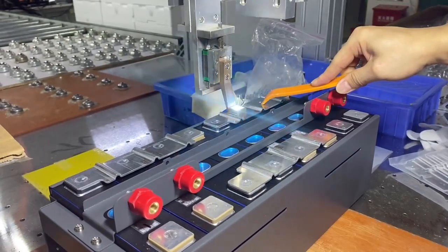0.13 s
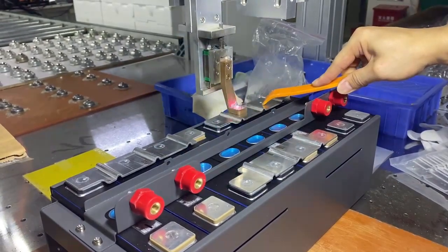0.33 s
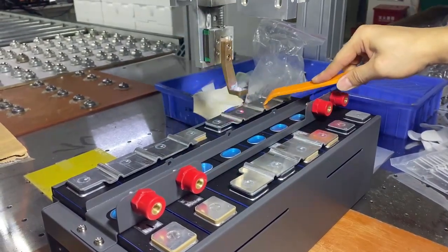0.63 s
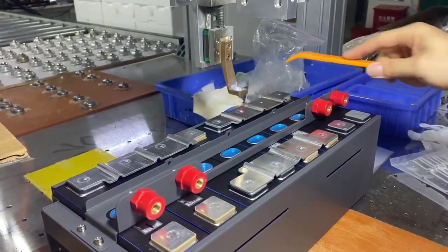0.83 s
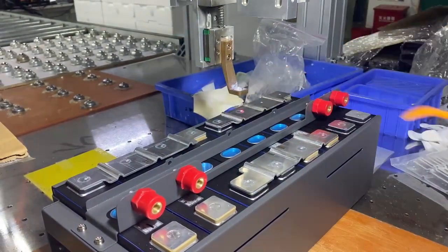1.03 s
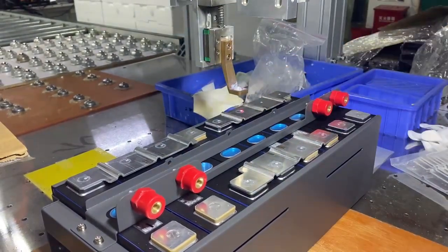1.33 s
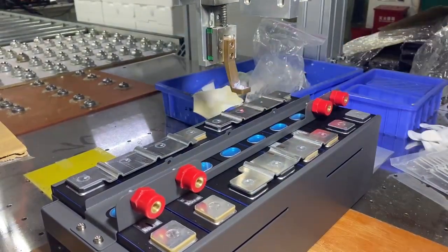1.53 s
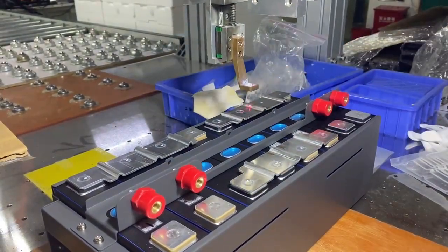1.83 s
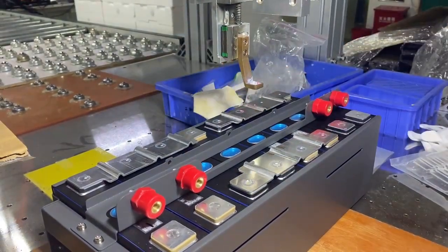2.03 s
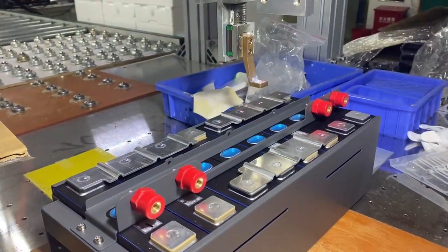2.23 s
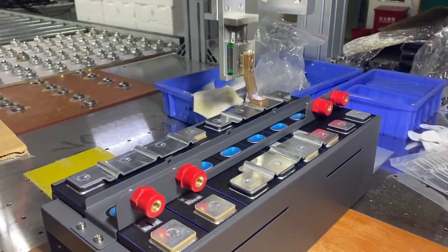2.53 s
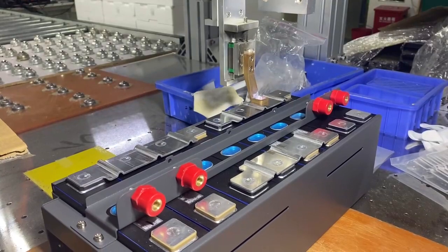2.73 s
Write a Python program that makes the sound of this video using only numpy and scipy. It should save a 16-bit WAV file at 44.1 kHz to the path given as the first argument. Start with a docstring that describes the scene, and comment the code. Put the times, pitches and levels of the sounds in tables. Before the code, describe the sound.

A loud, bright gas hiss from a welding head opens at full force and dies within half a second, leaving a low fan drone; later an air puff and sharp metal click, heard close in a workshop.

```python
"""A workshop with a laser spot welder. At once the weld's loud gas jet, hiss plus nozzle resonances, dies away
with a faint squeak and click; later the head lifts: an air valve puffs (noise through resonant ports),
the slide clicks against its stop (struck metal modes) and a short squeak of air follows.
An extractor fan drones (narrow noise bands, two soft low notes and a fainter higher one) over the hall's
coloured noise; a motor drive whines near 8 kHz (sine, modulated as the head moves)."""
import sys
import numpy as np
from scipy import signal
from scipy.fft import rfft, irfft, next_fast_len
from scipy.io import wavfile

SR = 44100
rng = np.random.default_rng(int(sys.argv[2]) if len(sys.argv) > 2 else 0)


def transcribe(signal):
    """Save signal, clipped to [-1, 1], as a 16-bit WAV file at the path in sys.argv[1]."""
    frames = np.atleast_2d(signal).T
    limited = np.clip(frames, -1, 1)
    pcm = np.round(limited * 32767).astype(np.int16)
    wavfile.write(sys.argv[1], SR, pcm)


def convert_level_to_amplitude(level_db):
    """Map a level in decibels to its linear amplitude factor."""
    exponent = np.asarray(level_db, float) / 20
    return 10 ** exponent


N = 127449
HZ = np.maximum(np.arange(N // 2 + 1) * SR / N, 1.0)
HALL_LAG_S = 0.000418


def rms_one(x):
    """Scale to rms 1."""
    return x / np.sqrt(np.mean(x ** 2) + 1e-20)


def in_time(rows):
    """Join (s, value) rows by straight lines."""
    return np.interp(np.arange(N) / SR, *np.transpose(rows))


def at_hz(points):
    """Join (Hz, value) rows on a log-frequency axis."""
    hz, value = np.transpose(points)
    return np.interp(np.log(HZ), np.log(hz), value)


def drift(rate_hz):
    """Slow random curve of rms 1: noise low-passed at rate_hz."""
    return rms_one(irfft(rfft(rng.standard_normal(N)) / (1 + (HZ / rate_hz) ** 2), N))


def air(gain, alike, lag_s):
    """Stereo noise of a given colour, rms 1; the shared part reaches the right side late."""
    shared, left, right = rfft(rng.standard_normal((3, N)))
    alike = np.clip(alike, 0, 1)
    common, own = np.sqrt(alike), np.sqrt(1 - alike)
    late = np.exp(-2j * np.pi * HZ * lag_s)
    sides = np.array([common * shared + own * left, common * shared * late + own * right])
    return rms_one(irfft(gain * sides, N))


def whistles(peaks, alike, lag_s):
    """Noise twice through each resonance, each at its own level."""
    total = 0
    for hz, width_hz, db in peaks:
        gain = 1 / (1 + (2 * (HZ - hz) / width_hz) ** 2)
        total = total + convert_level_to_amplitude(db) * air(gain, alike, lag_s)
    return total


def jet():
    """Turbulent hiss plus nozzle resonances, fluttering slightly; treble fades early, the low end swells late."""
    # gas jet at the weld: t/s, level/dB
    jet_level = [(0, -22.5), (.07, -21.5), (.18, -22), (.21, -26.5), (.3, -24.5), (.33, -31.5),
                 (.37, -36.5), (.42, -38.5), (.5, -42), (.6, -57)]
    # hiss spectrum: f/Hz, density/dB per Hz
    colour = [(300, -11.5), (600, 4), (1000, 2.5), (1600, 2.5), (2500, 1), (4200, 1.5), (5500, -4.5),
              (5900, -3), (7000, -4), (9500, -4), (12500, -5.5), (12950, 6), (13500, -2), (14000, -14),
              (14500, -1), (15100, 0), (16500, 0)]
    # nozzle resonances: f/Hz, width/Hz, level/dB against the hiss, before the share
    nozzle = [(1130, 130, -12.5), (1347, 146, -8), (1844, 110, -16), (3270, 40, -15), (3500, 330, -5.5),
              (4880, 110, -13), (5400, 250, -16), (6400, 400, -13), (8600, 300, -29), (11700, 530, -20)]
    # gain of the resonances, fading as the flow stops: t/s, gain/dB
    nozzle_share = [(0, 0.5), (.2, 0.5), (.33, 0), (.38, -3.5), (.5, -14)]
    # gain of the treble: t/s, gain/dB
    treble_gain = [(0, 2.5), (.18, 7.5), (.23, 8), (.3, 2), (.41, -5), (.5, -12)]
    # gain of the low end: t/s, gain/dB
    low_gain = [(0, -2), (.3, 2), (.36, 9.5), (.42, 0), (.5, -9)]
    alike, lag_s = 0.61, .00007
    treble_from_hz, low_under_hz = 6560, 1610
    flutter_db, flutter_hz = .6, 7.2

    hiss = air(convert_level_to_amplitude(at_hz(colour)), alike, lag_s)
    hiss = hiss + convert_level_to_amplitude(in_time(nozzle_share)) * whistles(nozzle, alike, lag_s)
    treble = irfft(rfft(hiss) / (1 + (treble_from_hz / HZ) ** 8), N)
    low = irfft(rfft(hiss) / (1 + (HZ / low_under_hz) ** 8), N)
    hiss = hiss + (convert_level_to_amplitude(in_time(treble_gain)) - 1) * treble + (convert_level_to_amplitude(in_time(low_gain)) - 1) * low
    return convert_level_to_amplitude(in_time(jet_level) + flutter_db * drift(flutter_hz)) * hiss


def hall():
    """Distant machines as broad noise; the fan's drone as narrow resonances of noise."""
    # hall noise: t/s, level/dB
    hall_level = [(0, -28.5), (.35, -33.5), (.6, -31), (.87, -32), (.94, -25.5), (1.5, -26), (2.3, -26.5),
                  (2.5, -24.5), (2.89, -25.5)]
    # noise spectrum: f/Hz, density/dB per Hz
    colour = [(20, -34), (45, -5), (75, -2.5), (110, -7), (160, -5.5), (230, -7), (300, -11.5),
              (400, -12.5), (520, -17.5), (620, -15.5), (900, -19.5), (1300, -22.5), (2000, -30.5),
              (3000, -33), (4500, -36.5), (6500, -46.5), (9000, -53), (12000, -55.5), (15000, -62)]
    # left-right likeness: f/Hz, shared power [0-1]
    likeness = [(50, 0.99), (250, 0.91), (600, 0.44), (1500, 0.092), (2600, 0.36), (3700, 0.27),
                (4500, 0.52), (6000, 0.083)]
    # stereo balance: f/Hz, left over right/dB
    balance = [(300, 1), (800, 3), (1500, 0), (5500, -1)]
    # fan drone: f/Hz, width/Hz, level/dB against the hall noise
    fan = [(111.7, 24, 1.5), (220.9, 21.8, -5.5), (587, 27, -20)]

    tilt = convert_level_to_amplitude(at_hz(balance) * [[.5], [-.5]])
    noise = air(convert_level_to_amplitude(at_hz(colour)) * tilt, at_hz(likeness), HALL_LAG_S)
    return convert_level_to_amplitude(in_time(hall_level)) * (noise + whistles(fan, 0.87, HALL_LAG_S))


def drive():
    """A carrier tone; side tones at the motor's turning rate and a throb while the head moves."""
    # drive whine: t/s, level/dB, motion of the head [0-1]
    whine = [(0, -76, 0), (.9, -70, 0), (1.0, -64, 0), (1.4, -60, 0), (1.46, -59.5, 0.9),
             (1.8, -58.5, 0.87), (2.2, -61, 1), (2.28, -65, 0), (2.6, -70, 0), (2.89, -72, 0)]
    whine_hz, turning_hz, turning_depth = 8000, 48, 0.88
    throb_hz, throb_db = 14.2, 3

    s, db, motion = np.transpose(whine)
    moving = in_time(np.c_[s, np.clip(motion, 0, 1)])
    throb = np.cos(2 * np.pi * np.cumsum(throb_hz * (1 + 0.088 * drift(4.0))) / SR)
    turning = np.cos(2 * np.pi * np.cumsum(turning_hz * (1 + .25 * drift(12.2))) / SR)
    level_db = in_time(np.c_[s, db]) + moving * throb_db * throb + 1.5 * drift(8.0)
    carrier = np.sin(2 * np.pi * whine_hz * np.arange(N) / SR)
    return convert_level_to_amplitude(level_db) * (1 + turning_depth * moving * turning) * carrier


def valve():
    """Air noise and whistling ports under a puff's envelope; brief squeaks as noise through resonances."""
    # air valve as the head lifts: t/s, level/dB
    puff_level = [(2.345, -101), (2.37, -38), (2.43, -38), (2.52, -45), (2.56, -40), (2.6, -41.5),
                  (2.625, -52), (2.75, -77)]
    # puff spectrum: f/Hz, density/dB per Hz
    colour = [(800, -17), (1500, -22), (2500, -4), (3500, -1.5), (5500, -3.5), (7000, -7), (11000, -6.5),
              (13000, -13), (14200, -8), (15200, -17)]
    # port resonances: f/Hz, width/Hz, level/dB against the puff
    ports = [(3000, 300, -7), (3740, 230, -9), (4490, 120, -5.5), (5300, 200, -16), (10200, 400, -26),
             (15400, 700, -16)]
    # squeaks of escaping air: middle t/s, length/s, level/dB
    squeaks = [(.44, 0.047, -42.5), (2.583, 0.032, -38)]
    # squeak resonances: f/Hz, width/Hz, level/dB
    squeak_tones = [(6900, 220, -10), (11500, 450, -3.5), (15100, 1300, -8)]

    puff = air(convert_level_to_amplitude(at_hz(colour)), 0.22, HALL_LAG_S) + whistles(ports, 0.67, HALL_LAG_S)
    t = np.arange(N) / SR
    bumps = np.zeros(N)
    for middle_s, length_s, db in squeaks:
        bumps += convert_level_to_amplitude(db) * np.exp(-(3.0 * (t - middle_s) / length_s) ** 2)
    return convert_level_to_amplitude(in_time(puff_level)) * puff + bumps * whistles(squeak_tones, 0.86, HALL_LAG_S)


def slide():
    """Each contact strikes all modes with strengths of its own, adds a noise crack and is band-limited."""
    # contacts of the metal slide: t/s, peak/dB, lowest f/Hz, highest f/Hz excited
    contacts = [(0.606, -43, 6000, 15500), (2.5317, -10.5, 3000, 15200), (2.5328, -11.5, 1000, 4530),
                (2.5365, -15.5, 1230, 3500), (2.5403, -23, 4070, 6840), (2.604, -29, 4500, 6200),
                (2.604, -27, 1510, 2820)]
    # modes of the slide: f/Hz, mean level/dB, t60/s
    modes = [(1280, -9, .025), (1720, -2, .035), (1840, -16, .16), (1910, -2, .035), (2750, -6, .015),
             (3600, -5, .015), (4500, -8, .015), (5100, -6, .02), (5700, -7, .025), (7900, -2, .01),
             (10600, -2, .008), (12400, -8, .012), (15000, -8, .008)]
    crack_db, crack_t60_s, spread_db = -3, .018, 1.9

    out, t = np.zeros(N), np.arange(SR // 5) / SR
    for s, peak_db, low_hz, high_hz in contacts:
        ring = convert_level_to_amplitude(crack_db - 60 * t / crack_t60_s) * rng.standard_normal(len(t))
        for hz, mode_db, t60_s in modes:
            strength_db = mode_db + spread_db * rng.standard_normal()
            ring += convert_level_to_amplitude(strength_db - 60 * t / t60_s) * np.sin(2 * np.pi * hz * t)
        band = signal.butter(2, [low_hz, min(high_hz, .45 * SR)], "band", fs=SR, output="sos")
        blow = signal.sosfilt(band, ring)
        start = int(s * SR)
        out[start:start + len(t)] += convert_level_to_amplitude(peak_db) * blow / np.abs(blow).max()
    return out


def shop(x):
    """Reverberation as a dying noise tail, another one for each side."""
    t60_s, gap_s = 0.28, .004
    t = np.arange(SR // 2) / SR
    tail = rng.standard_normal((2, len(t))) * convert_level_to_amplitude(-60 * t / t60_s) * (t > gap_s)
    return signal.fftconvolve(x[None], tail / np.sqrt(np.sum(tail[0] ** 2)), axes=1)[:, :N]


def scene():
    """All sources together; the clicks sit slightly left and reverberate."""
    left_over_right_db, shop_db = 1.5, -25
    clicks = slide()
    panned = clicks * convert_level_to_amplitude(left_over_right_db * np.array([[.5], [-.5]]))
    return jet() + hall() + drive() + valve() + panned + convert_level_to_amplitude(shop_db) * shop(clicks)


def top_cut(x):
    """Nothing passes above the cut-off."""
    return signal.sosfilt(signal.butter(12, 16990, fs=SR, output="sos"), x)


def record(dry):
    """The treble is one signal on both sides, by turns in and out of phase; the top is cut."""
    cutoff_hz, one_treble_hz = 15690, 6050
    in_phase_hz, turn_hz, snap = 6910, 4190, 1.2  # snap > 1 holds the phase at 0 and 180 degrees

    size = next_fast_len(N + SR // 10)
    hz = np.arange(size // 2 + 1) * SR / size
    left, right = rfft(dry, size) * np.clip((cutoff_hz - hz) / 150, 0, 1)
    turn = 2 * np.pi * (hz - in_phase_hz) / turn_hz
    along = np.clip(snap * np.cos(turn), -1, 1)
    across = np.sign(np.sin(turn)) * np.sqrt(1 - along ** 2)
    turned = left * (along + 1j * across)
    share = np.clip((hz - one_treble_hz) / 300 + .5, 0, 1)
    right = np.sqrt(share) * turned + np.sqrt(1 - share) * right
    both = irfft(np.array([left, right]), size)[:, :N]
    return top_cut(both)


dry = scene()
out = record(dry)
transcribe(out)
```